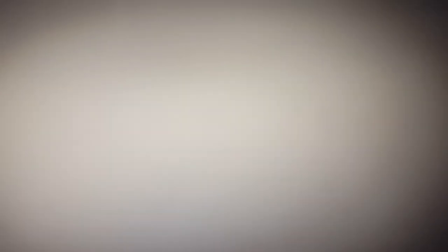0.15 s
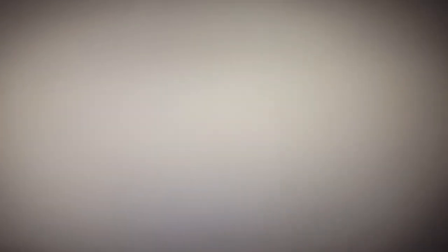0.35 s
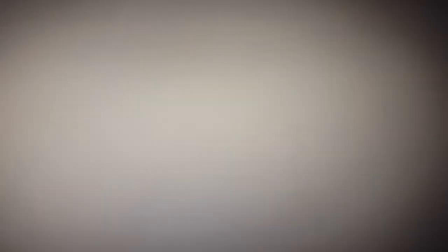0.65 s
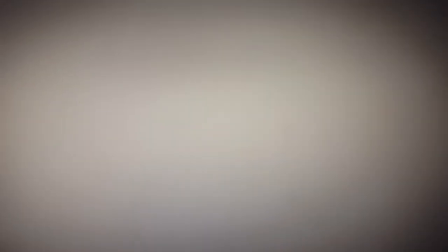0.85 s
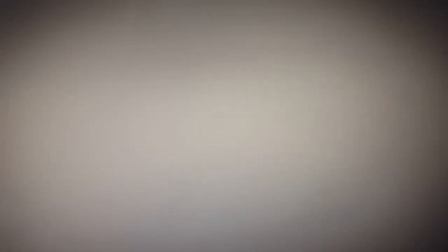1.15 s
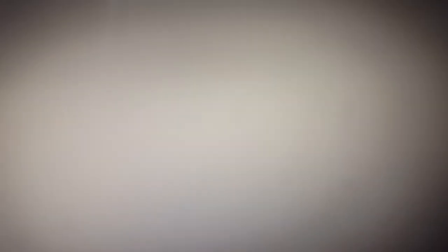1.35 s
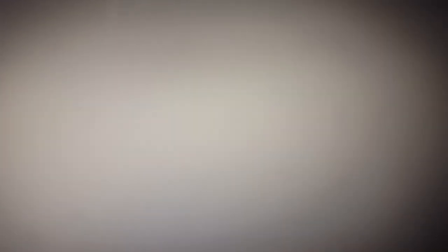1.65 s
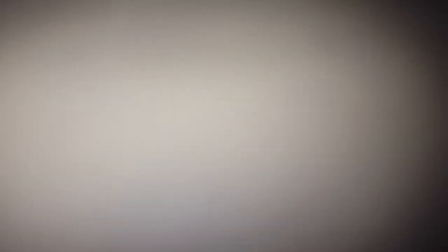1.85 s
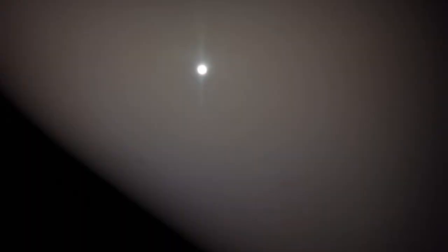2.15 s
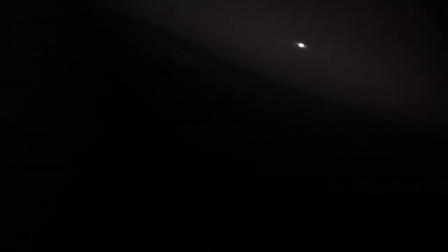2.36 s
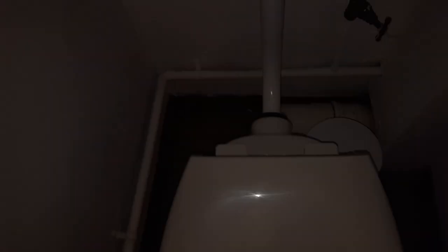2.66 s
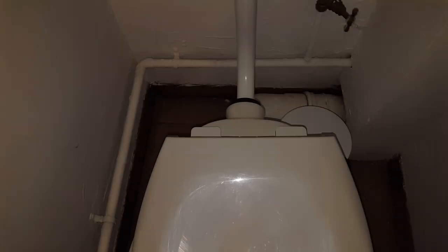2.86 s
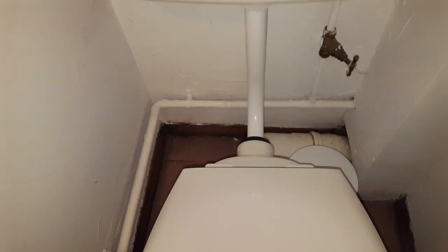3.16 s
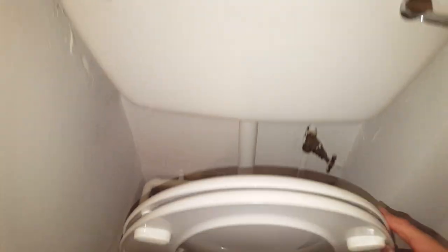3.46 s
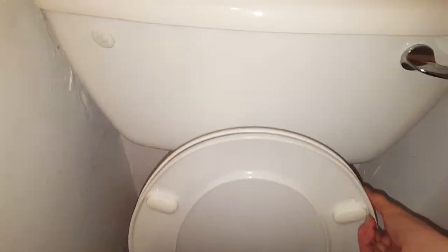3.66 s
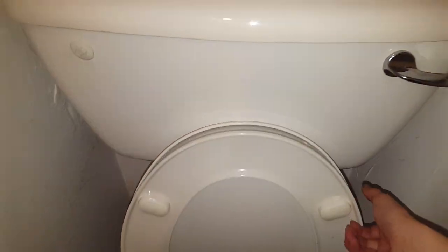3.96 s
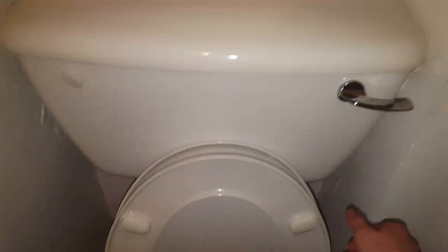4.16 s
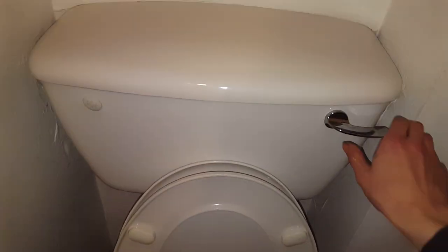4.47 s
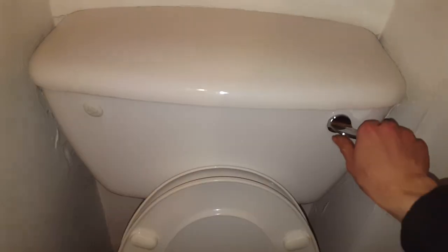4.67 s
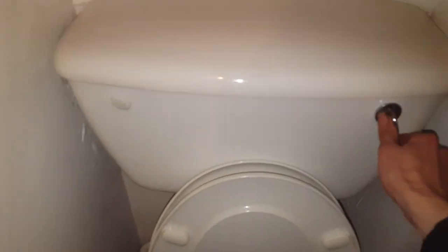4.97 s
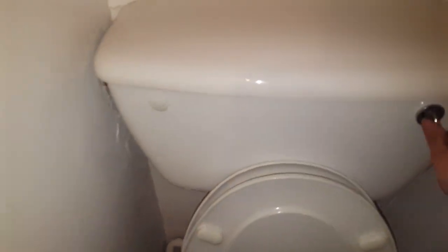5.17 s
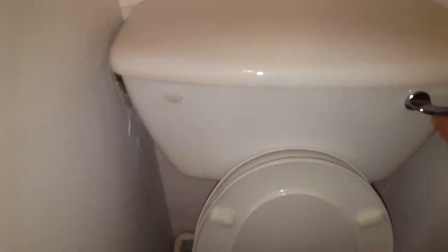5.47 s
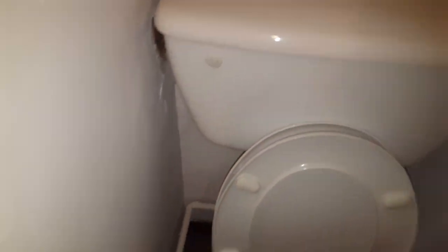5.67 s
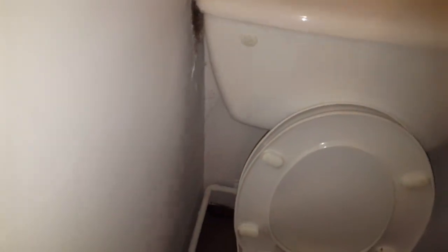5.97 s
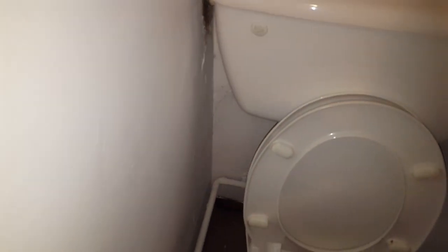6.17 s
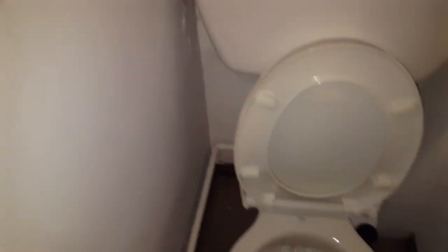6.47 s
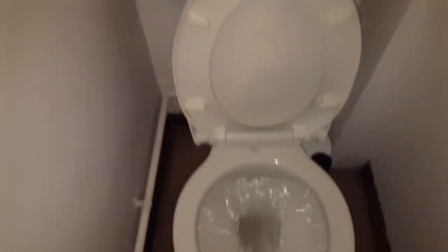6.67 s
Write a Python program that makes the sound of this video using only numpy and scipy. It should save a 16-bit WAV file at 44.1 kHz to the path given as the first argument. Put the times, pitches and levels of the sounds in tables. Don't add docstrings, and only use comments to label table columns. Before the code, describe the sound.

A light door knocks, scrapes and thumps closed with boxy resonance, muting a low fan. Soft cloth and finger ticks follow while a toilet seat is raised, striking the cistern hard. The flush handle clunks, the siphon gulps, and metal clanks against ceramic. After a brief trickle, water bursts into the bowl, still rushing at the end. Phone microphone, close, tiled cubicle.

```python
import sys
import numpy as np
from scipy import signal
from scipy.fft import rfft, irfft, next_fast_len
from scipy.io import wavfile
from scipy.ndimage import uniform_filter1d

SR = 44100
rng = np.random.default_rng(int(sys.argv[2]) if len(sys.argv) > 2 else 0)


def ratio_of_db(decibels):
    return 10 ** (np.asarray(decibels, float) / 20)


def generate_wav(signal):
    frames = np.transpose(np.atleast_2d(signal))
    scaled = np.clip(frames, -1, 1) * 32767
    pcm = np.round(scaled).astype(np.int16)
    wavfile.write(sys.argv[1], SR, pcm)


N = 300762

# start_s, peak_db, thud_rel_db, crack_rel_db
LATCH = [
    (0.716, -20, 13.5, -61),
    (0.732, 4.5, -11, -74.5),
]
BOLT = [
    (0.975, -8, 2.5, -30),
    (1.142, -21, -2, -15),
]
DOOR = [
    (1.646, -2, 1, -48),
    (1.752, -13.5, 6.1, -63.5),
]
SHUT = [
    (2.0052, -5.5, -0.63, -65.5),
]
SEAT = [
    (2.737, -35.5, 1, -7),
    (2.96, -18.5, -0.5, -16),
    (3.078, -34.5, 1, -22),
    (3.229, -32, 2.5, -25),
    (3.897, -5, -29.5, -13),
    (3.92, -22.5, 7, -2),
    (4.085, -34, 3.5, -59),
    (4.211, -46, 14, -16),
]
# pitch_hz, level_db, t60_s
CUBICLE = [(109, -24.5, 0.48), (142.6, 8.5, 0.8), (182.1, -4.5, 0.63), (235, -9, 0.32), (270.6, -3, 0.9),
           (355, -2.5, 0.23), (409.7, -6, 0.69), (438.3, -9.5, 0.55)]
# freq_hz, likeness (0-1)
ALIKE = [(30, 0.29), (80, 0.97), (150, 0.99), (300, 0.92), (600, 0.72), (1500, 0.02), (8000, 0.019)]
# time_s, effort_db
SUCK = [
    (4.86, -15),
    (4.9, -9.5),
    (4.945, -11),
    (4.96, 8),
    (5.01, 5),
    (5.07, 9),
    (5.1, -13.5),
]
# full_effort_db, growth_db_per_db
SUCK_LAWS = [
    (-37, 1.2),
    (-41, 0.26),
    (-37.5, 0.8),
    (-46.5, 1.34),
]
# time_s, effort_db
FLOW = [
    (5.26, -28),
    (5.6, -28),
    (5.68, -34),
    (5.75, -28.5),
    (6.09, -25),
    (6.13, -20),
    (6.24, -14.5),
    (6.5, -5.5),
    (6.82, -5.5),
]
# full_effort_db, growth_db_per_db
FLOW_LAWS = [
    (-18.5, 0.84),
    (-14.5, 1.255),
    (-27.5, 1.103),
    (-32.5, 2.3),
]


def unit(x):
    return x / np.sqrt(np.mean(x ** 2) + 1e-20)


def along(points, hz):
    f, v = np.transpose(points)
    return np.interp(np.log(hz + 1), np.log(f + 1), v)


def pair(size):
    hz, t, z = signal.stft(rng.standard_normal((2, size)), SR, nperseg=256)
    return hz[:, None], t, z


def blend(a, b, hz):
    turn = np.arccos(np.clip(along(ALIKE, hz), 0, 1)) / 2
    mid, side = np.cos(turn) * a, np.sin(turn) * b
    return np.array([mid + side, mid - side])


def filtered(x, gain):
    m = next_fast_len(N + 4096)
    return irfft(rfft(x, m) * gain(np.fft.rfftfreq(m, 1 / SR)), m)[:, :N]


def no_deep_bass(hz):
    return 1 / (1 + 95 / (1j * hz + 0.00077)) ** 3


def shape(spectrum):
    return lambda hz: ratio_of_db(along(spectrum, hz))


def peaks(modes, between_db):
    low_hz, high_hz = modes[0][0], modes[-1][0]

    def half_width_hz(t60):
        return np.log(1000) / (2 * np.pi * np.clip(t60, .05, .5))

    def gain(f):
        low_cut = 1 + (0.099 * low_hz / (f + 1)) ** 4
        high_cut = 1 + (f / (0.066 * high_hz)) ** 2
        total = ratio_of_db(between_db) / low_cut / high_cut
        for hz, db, t60 in modes:
            half = half_width_hz(t60)
            total = total + ratio_of_db(db) * half / np.abs(f - hz + 1j * half)
        return total
    return gain


def rush(gain, patchy_db):
    m = next_fast_len(N)
    _, _, z = pair(m)
    field = uniform_filter1d(rng.standard_normal(z.shape[1:]), 3, 0)
    field = unit(uniform_filter1d(field, 12, 1))
    a, b = rfft(signal.istft(z * ratio_of_db(patchy_db * field), nperseg=256)[1], m)
    hz = np.fft.rfftfreq(m, 1 / SR)
    return unit(irfft(gain(hz) * blend(a, b, hz), m)[:, :N])


def driven(effort, laws):
    s, db = np.transpose(effort)
    t = np.arange(N) / SR
    active = (t >= s[0]) * (t <= s[-1])
    effort_db = np.interp(t, s, db)
    return np.array([ratio_of_db(top_db + growth * effort_db) * active for top_db, growth in laws])


def add(out, s, x, db, pan_db):
    part = out[:, round(s * SR):][:, :x.shape[1]]
    part += (x * ratio_of_db(db + pan_db * np.array([[.5], [-.5]])))[:, :part.shape[1]]


def ring(modes, t, stretch, tilt_db):
    hz, db, t60 = np.transpose(modes)[:, :, None, None]
    strength, lag, beat = rng.standard_normal((3, len(modes), 1, 1))
    unlike = np.arccos(np.clip(along(ALIKE, hz), 0, 1))
    phase = 1.03 * unlike * lag * np.array([[.5], [-.5]])
    decay_db = 60 * t / (np.minimum(t60, .5) * stretch)
    fade = ratio_of_db(db + strength + tilt_db * np.log2(hz / 800) - decay_db)
    sign = np.where(np.diff(hz, axis=0, prepend=0) < hz / 50, -1, 1)
    flutter = 1 + .3 * np.sin(90 * beat * t)
    x = (sign * flutter * fade * np.sin(2 * np.pi * hz * t + phase)).sum(axis=0)
    return x / np.abs(x).max()


def tail(colour, stretch, size):
    # freq_hz, t60_s
    tile_decay = [(100, 0.71), (500, 0.29), (2000, 0.24), (5000, 0.22), (14000, 0.17)]
    hz, t, (a, b) = pair(size + 256)
    decay_db = 60 * np.maximum(t - 128 / SR, 0) / (along(tile_decay, hz) * stretch)
    z = blend(a, b, hz) * ratio_of_db(along(colour, hz) - decay_db)
    return signal.istft(z, nperseg=256)[1][:, 128:size + 128]


def blows(events, modes, ring_db, scatter_db, soft_s, boom_tilt_db, stretch, pan_db, hump_db=14):
    out, t = np.zeros((2, N)), np.arange(int(.45 * SR)) / SR
    rise = 1 - np.exp(-(t / soft_s) ** 2)
    direct = 1 + .55 * np.exp(-t / .005)
    for s, db, thud_db, crack_db in events:
        colour = [(1, thud_db), (250, thud_db + hump_db), (1200, 0.016),
                  (3000, crack_db / 2), (7000, crack_db - 5), (16000, crack_db - 26)]
        snap = ratio_of_db(crack_db - 60 * t / 0.0062) * rng.standard_normal(len(t))
        body = ratio_of_db(ring_db) * ring(modes, t, stretch, 0.056 * (crack_db + 16.5))
        body += ratio_of_db(scatter_db) * tail(colour, stretch, len(t))
        add(out, s, rise * direct * body + 0.05 * snap, db, pan_db)
        add(out, s, rise * ring(CUBICLE, t, 0.8, boom_tilt_db), db + thud_db, 0)
    return out


def ticks(events, skirt_db, stretch, pan_db, wide, tone):
    out, t = np.zeros((2, N)), np.arange(int(.2 * SR)) / SR
    direct = 1 + 1.5 * np.exp(-t / .004)
    for s, db, hz in events:
        colour = [(hz / 5, 0.98 * skirt_db), (hz / wide, skirt_db), (hz, 0),
                  (hz * wide, skirt_db), (hz * 4, 2 * skirt_db), (hz * 8, 4.2 * skirt_db)]
        click = ratio_of_db(-60 * t / .012) * (1 - np.exp(-t * hz / 2)) * np.sin(2 * np.pi * hz * t)
        add(out, s, tone * click + ratio_of_db(9) * direct * tail(colour, stretch, len(t)), db, pan_db)
    return out


def notes(rows, pan_db):
    out, t = np.zeros((2, N)), np.arange(int(.4 * SR))[None] / SR
    for s, db, hz, life_s, glide in rows:
        u = t / life_s
        waver = 1 + .25 * np.sin(2 * np.pi * hz / 45 * t)
        swell = 3 * u * np.exp(1 - 3 * u - u ** 3)
        add(out, s, waver * swell * np.sin(2 * np.pi * hz * t * (1 + glide * u / 2)), db, pan_db)
    return out


def rubbing(drive, modes, hollow, ring_db, boom_db, rasp_db, boom_tilt_db, patchy_db, between_db):
    # freq_hz, level_db
    rasp_spectrum = [(1470, -3.5), (2500, 2), (3230, -3.5), (3490, -6), (3600, -35), (4020, -34),
                     (16000, -45)]
    ringing, boom, rasp = drive
    tilted = [(hz, db + boom_tilt_db * np.log2(hz / 250), t60) for hz, db, t60 in hollow]
    x = ratio_of_db(ring_db) * ringing * rush(peaks(modes, between_db), patchy_db)
    x += ratio_of_db(boom_db) * boom * rush(peaks(tilted, -13), patchy_db=-2)
    return x + ratio_of_db(rasp_db) * rasp * rush(shape(rasp_spectrum), patchy_db=2.5)


def air():
    # time_s,
    # effort_db
    stir = [(0, 0), (1.6, -3), (1.8, -10.5), (2.0, -1), (2.3, -2), (2.7, -4.5), (2.95, -0.5), (3.2, -1.5),
            (3.45, -0.5), (4.05, -1.5), (4.4, -5.5), (4.75, -3), (5.4, -25), (6.82, 2.5)]
    # full_effort_db, growth_db_per_db
    stir_laws = [
        (-51, 1.8),
        (-55, 1.9),
        (-59, 2),
    ]
    # pitch_hz, rms_db
    fan = [(199.2, -50.5), (247.6, -54.5), (387.6, -70), (759.0, -64)]
    # freq_hz, level_db_per_hz
    rumble_spectrum = [(53, -48.5), (90, -0.5), (230, -0.5), (473, -7.5), (528, -19.5), (600, -21.5),
                       (780, -22.5), (1320, -120)]
    murmur_spectrum = [(290, -29.5), (500, -5), (1030, -10), (2200, -10), (2450, -10), (3500, -26),
                       (4550, -38), (7700, -120)]
    hiss_spectrum = [(1760, -39), (3000, -7), (4170, -10), (5140, -9.5), (13400, -18.5), (16000, -22.5)]
    shake_spectrum = [(8.8, -26.5), (15, -2), (27, 0), (92, -3.5), (110, -3.5), (140, -32), (240, -120)]
    fan_shut_s, fan_rumble_db, shake_db = 1.645, -71, -67.5
    wake_db, wake_t60_s = -17.5, 0.42

    t = np.arange(N) / SR
    fan_on = t < fan_shut_s
    rumble, murmur, hiss = driven(stir, stir_laws)
    rumble = rumble + ratio_of_db(fan_rumble_db) * fan_on
    for s, db, thud_db, _ in LATCH + BOLT + DOOR + SHUT + SEAT:
        onset = np.clip((t - s) / 0.024, 0, 1)
        rumble += onset * ratio_of_db(db + thud_db + wake_db - 60 * np.abs(t - s) / wake_t60_s)
    hiss = hiss + driven(SUCK, SUCK_LAWS)[-1] + driven(FLOW, FLOW_LAWS)[-1]
    lines = np.zeros(N)
    for hz, db in fan:
        drift = np.cumsum(rng.normal(0, 0.025, N))
        lines += ratio_of_db(db + 1) * np.sin(2 * np.pi * hz * t + drift)
    x = rumble * rush(shape(rumble_spectrum), patchy_db=0)
    x += murmur * rush(shape(murmur_spectrum), patchy_db=2)
    x += ratio_of_db(shake_db) * rush(shape(shake_spectrum), patchy_db=0)
    return x + hiss * rush(shape(hiss_spectrum), patchy_db=1.2) + lines * fan_on


def deep_sway():
    # start_s, level_db, pitch_hz, t60_s
    sway = [
        (0.731, -35, 58.7, 0.78),
        (.98, -33, 60, 0.42),
        (1.652, -39, 60.7, 0.15),
        (3.899, -32.5, 51.3, 0.11),
    ]
    out, t = np.zeros((2, N)), np.arange(SR)[None] / SR
    for s, db, hz, t60 in sway:
        add(out, s, ratio_of_db(-60 * t / t60) * (1 - np.exp(-t / .01)) * np.sin(2 * np.pi * hz * t), db, 0)
    return out


def small_ticks():
    # start_s, peak_db, pitch_hz
    tick_events = [(2.2638, -51.5, 2370), (2.5664, -56, 3680), (3.0205, -44.5, 6040), (3.1113, -51.5, 2300),
                   (3.1512, -51, 2410), (3.3428, -37.5, 5600), (3.3851, -40, 2050), (3.5428, -44.5, 5900),
                   (3.6636, -50, 6500), (4.612, -54, 1175), (4.8963, -51, 9000), (3.345, -48, 12800),
                   (3.617, -60, 8000), (1.985, -54.5, 3360)]
    return ticks(tick_events, skirt_db=-7.5, stretch=1.29, pan_db=3, wide=1.18, tone=0.15)


def first_contacts():
    # start_s, peak_db, pitch_hz
    snaps = [
        (.7315, -26.5, 2560),
        (1.6462, -35, 4370),
        (3.8965, -7.5, 2420),
    ]
    return ticks(snaps, skirt_db=-13.5, stretch=0.091, pan_db=2, wide=1.08, tone=0.54)


def door():
    # pitch_hz, level_db, t60_s
    panel = [(517, -14, .2), (612, -18, .1), (714, -18, .3), (759, 0, .25), (802, -8, .3), (867, -20, .24),
             (1109, -26, .14), (1270, -27, .2), (1676, -8, .17), (1698, -8, .2), (2300, -34, .15),
             (2720, -36, .15)]
    strike = [(597, -0.5, 0.13), (640, -9, 0.64), (736, 7, 0.32), (1280, -7.5, 0.38), (1700, -10.5, 0.38),
              (2290, -16.5, 0.35), (2780, -30, 0.49), (3410, -31, 0.26)]
    slab = [(533, -1.5, .2), (670, -4, .25), (860, 0, .13), (1290, -7, .16), (1400, -8, .14),
            (1700, -4, .12), (2010, -18, .1), (2260, -20, .15), (2720, -15, .2), (3900, -34, .1)]
    jamb = [(519, -6, .14), (677, -10, .2), (830, -3, .16), (1276, -2.5, .25), (1416, -4, .16),
            (1690, 2.5, .2), (1780, 1.5, .12), (3025, -19, .14), (3300, -24, .1), (3720, -25, .08)]
    scrape = [(755, 12, .2), (880, 4, .15), (1280, 5, .2), (1385, 6, .2), (1690, 12, .25), (2090, -5, .25),
              (2270, 3, .18), (2710, 3, .2), (3030, -3, .25), (3395, -11, .2), (3715, -12, .25),
              (3905, -10, .25), (4305, -12, .2),
              (4510, -16, .3), (4900, -17, .2), (5620, -18, .2), (5900, -19, .2), (6725, -15, .3),
              (9405, -16, .3)]
    leaf = [(180, -9, 0.12), (235, -4, 0.18), (290, 0.5, 0.12), (345, -11.5, 0.1), (430, -15.5, 0.16)]
    # start_s, peak_db, thud_rel_db, crack_rel_db
    catch = [
        (1.212, -27, 4, -19),
        (1.23, -17, 8, -45),
    ]
    # time_s, effort_db
    drag = [
        (1.138, -16),
        (1.154, -11),
        (1.21, -14),
        (1.28, -11.5),
        (1.35, -9.5),
        (1.39, -3.5),
        (1.455, 0.5),
        (1.57, -24),
        (1.64, -15),
    ]
    # full_effort_db, growth_db_per_db
    drag_laws = [
        (-24.5, 1.12),
        (-19.5, 0.9),
        (-48.5, 2.1),
    ]
    # start_s, peak_db, pitch_hz, life_s, glide_ratio
    creaks = [(.715, -17, 760, .022, 0), (1.227, -11, 775, .03, 0), (1.145, -29, 320, .05, 0),
              (1.245, -20, 385, .07, -.03), (1.385, -26, 765, .04, 0), (1.425, -14, 225, .05, -.03),
              (1.437, -24, 755, .035, -.04), (1.455, -29, 716, .1, 0), (1.465, -17, 205, .05, 0),
              (1.422, -25, 1690, .04, 0), (.737, -25, 1690, .07, 0), (.983, -24, 1280, .045, 0),
              (.976, -25, 1690, .045, 0), (.976, -16, 750, .04, 0), (.776, -16, 760, .055, 0),
              (1.14, -38, 2290, .07, 0)]
    booms = [
        (1.646, -13, 178.3, 0.14, 0.042),
        (1.646, -10, 368.5, 0.061, -0.04),
        (1.77, -9.5, 174.7, 0.047, 0.026),
        (2.005, -12.5, 177, 0.036, -0.024),
        (2.07, -26.5, 239, 0.091, -0.019),
        (.79, -20.5, 180, 0.052, -0.00036),
    ]
    lag_samples = 11

    x = blows(LATCH, panel, ring_db=-3.5, scatter_db=-14, soft_s=0.0021, boom_tilt_db=14,
              stretch=1.08, pan_db=2.7)
    x += blows(BOLT, strike, ring_db=-0.26, scatter_db=-12.5, soft_s=0.0024, boom_tilt_db=7.9,
               stretch=0.87, pan_db=5.6)
    x += blows(DOOR, slab, ring_db=-2, scatter_db=-2.76, soft_s=0.00035, boom_tilt_db=0.14,
               stretch=1, pan_db=0.36)
    x += blows(SHUT, jamb, ring_db=-1.2, scatter_db=-0.92, soft_s=0.0019, boom_tilt_db=-5.5,
               stretch=1, pan_db=0.65)
    x += rubbing(driven(drag, drag_laws), scrape, leaf, ring_db=-1.3, boom_db=-1, rasp_db=-20.5,
                 boom_tilt_db=0.3, patchy_db=1.8, between_db=-16.5)
    x += blows(catch, panel, ring_db=-2, scatter_db=-0.5, soft_s=0.0015, boom_tilt_db=3.5,
               stretch=0.53, pan_db=2.1)
    x += notes(creaks, 1.5) + notes(booms, 0.3)
    return np.array([x[0], np.roll(x[1], lag_samples)])


def seat():
    # pitch_hz, level_db, t60_s
    plastic = [(1257, 1.5, 0.19), (1532, 16.5, 0.031), (1760, 6, 0.099), (2100, 2, 0.2), (2490, 1, 0.14),
               (2450, -30, 0.31), (2780, -11, 0.15), (3680, -39, 0.16), (5410, -9.5, 0.18)]
    # start_s, peak_db, pitch_hz, life_s, glide_ratio
    bumps = [(2.77, -40, 203, 0.093, 0.0084), (2.77, -46, 345, 0.061, 0.0011), (2.935, -37, 245, 0.034, 0),
             (2.957, -33, 348, 0.11, 0), (2.96, -29.5, 215, 0.093, 0.0042), (3.0, -26, 143, 0.15, 0.0048),
             (3.378, -34.5, 141, 0.086, 0), (3.915, -30, 290, 0.093, 0.0033),
             (4.085, -30.5, 149.4, 0.11, 0), (4.21, -45, 148, .08, 0), (4.412, -58, 4200, .014, 0)]
    x = blows(SEAT, plastic, ring_db=-1.2, scatter_db=0.18, soft_s=0.0014, boom_tilt_db=-5,
              stretch=1, pan_db=1, hump_db=1.5)
    return x + notes(bumps, 0.3)


def cistern():
    # pitch_hz, level_db, t60_s
    linkage = [(300, -17, 0.038), (558, 0.5, 0.3), (770, -19, 0.38), (1030, -21, 0.18), (1250, -0.5, 0.82),
               (1770, -22, 0.085), (2070, 1, 0.17), (3100, -11, 0.11)]
    siphon = [(297, -18, 0.38), (342, -6, 0.097), (410, -6, 0.17), (585, -14, 0.058), (688, -12, 0.14),
              (1130, -14, 0.052)]
    tank = [(781, 3, .3), (921, -6, .35), (1225, -4, .15), (1335, 3, .09), (1373, -1, .2), (2078, -10, .2),
            (2342, -6, .2), (2498, -5, .24), (2681, -7, .25), (2830, -12, .3), (3390, -16, .3),
            (3924, -19, .3), (4377, -22, .22)]
    ceramic = [(781, -6, .4), (850, -8, .3), (1087, -12, .3), (1180, -2, .4), (1244, -1, .17),
               (1424, 3, .2), (1949, -14, .3), (2320, -2, .3), (2659, -6, .24), (3004, -7, .45),
               (3400, -8, .3), (3924, -12, .2), (4382, -20, .4), (4780, -22.5, .17)]
    # start_s, peak_db, thud_rel_db, crack_rel_db
    lever = [
        (4.744, -13.5, -14.5, -47),
        (4.865, -24.5, -6, -37),
    ]
    plunge = [
        (4.952, -0.5, -7, -54),
        (5.028, -5.5, -1.5, -25),
        (6.169, -27.5, 1, 6),
    ]
    clank = [
        (5.082, -5.5, -1, -7.5),
        (5.112, 0.5, -16.5, -50),
    ]
    rebound = [
        (5.198, -6.5, -0.5, -16.5),
        (5.212, -8, 1.5, -11),
        (5.228, -4, -27, -15.5),
    ]
    # start_s, peak_db, pitch_hz, life_s, glide_ratio
    gulps = [
        (4.954, -5.5, 372, 0.041, -0.067),
        (4.975, -20, 277.5, 0.079, -0.018),
        (4.985, -16, 585, 0.029, 0.052),
        (5.022, -11, 430, 0.026, -0.022),
        (5.04, -13.5, 272.3, 0.062, -0.05),
        (5.05, -16, 355, 0.054, -0.066),
    ]
    chimes = [(5.0815, -7, 1424, .022, 0), (5.0815, -11, 1240, .02, 0), (5.104, -14, 781, .06, 0),
              (5.2, -17, 1335, .03, 0), (5.228, -22, 781, .07, 0), (5.1, -17.5, 1707, .12, 0),
              (5.224, -16, 1707, .08, 0), (5.322, -38, 1707, .07, 0), (5.092, -21, 2325, .08, 0),
              (5.1, -27.5, 3004, .09, 0), (5.08, -30, 3400, .07, 0), (5.19, -28, 2720, .1, 0),
              (5.225, -37, 3924, .07, 0)]
    # time_s, effort_db
    slosh = [
        (5.08, -6),
        (5.09, 0),
        (5.184, -6),
        (5.226, -2.5),
        (5.26, -4.5),
        (5.356, -26.5),
        (5.5, -77),
    ]
    # full_effort_db, growth_db_per_db
    slosh_laws = [
        (-9, 1.04),
        (-19.5, 0.4),
        (-21, 1.5),
    ]

    x = blows(lever, linkage, ring_db=-14, scatter_db=-0.65, soft_s=0.0019, boom_tilt_db=1.3,
              stretch=1.25, pan_db=0.3)
    x += blows(plunge, siphon, ring_db=-6.5, scatter_db=-14, soft_s=0.0048, boom_tilt_db=9.1,
               stretch=4.2, pan_db=0.71)
    x += notes(gulps, 1)
    x += blows(rebound, tank, ring_db=-1.9, scatter_db=-9.5, soft_s=0.0014, boom_tilt_db=-1.5,
               stretch=0.62, pan_db=2.7)
    x += blows(clank, ceramic, ring_db=-1.9, scatter_db=-6, soft_s=0.00018, boom_tilt_db=-2.8,
               stretch=0.44, pan_db=7.6)
    x += notes(chimes, 7.6)
    gulp = driven(SUCK, SUCK_LAWS)[:-1] + driven(slosh, slosh_laws)
    return x + rubbing(gulp, ceramic + tank, CUBICLE, ring_db=-4.5, boom_db=-1.8, rasp_db=-0.8,
                       boom_tilt_db=8.4, patchy_db=2.8, between_db=-10)


def splashes():
    # start_s, peak_db, pitch_hz
    drops = [(5.5443, -33.5, 2630), (5.7912, -31, 2830), (6.1295, -18.5, 2700), (5.5423, -49.5, 11300),
             (5.8551, -51, 8600), (6.0147, -41.5, 6140), (6.2465, -16, 2826), (5.3927, -39, 3040),
             (5.9574, -37, 3610), (6.3281, -14.5, 2560), (6.4808, -14, 2710), (6.7287, -13, 2530),
             (6.2477, -25, 5250), (6.2485, -25.5, 9050), (6.3574, -19, 6780), (6.4258, -24, 9600),
             (6.4894, -24, 5020), (6.5694, -29.5, 8900), (6.7007, -24.5, 6160)]
    return ticks(drops, skirt_db=-19.5, stretch=0.73, pan_db=3.9, wide=1.102, tone=0.63)


def bubbles(count, mid_hz, spread, cycles, rise):
    when, tone, size, side = rng.random((count, 4)).T[:, :, None]
    hz = mid_hz * np.exp(spread * np.sqrt(12) * (tone - .5))
    k, start = np.arange(1024), int(FLOW[0][0] * SR)
    life = k / SR * hz / cycles
    envelope = ratio_of_db(-4 * np.log(size + 0.081)) * life * np.exp(-4 * life)
    x = envelope * np.sin(2 * np.pi * cycles * life * (1 + rise * life))
    at = ((start + when * (N - start)).astype(int) + k).ravel()
    both = np.array([np.bincount(at, (x * w).ravel(), N + 1536)[:N] for w in (side, 1 - side)])
    return both / both[:, start:].std()


def water():
    # pitch_hz, level_db, t60_s
    bowl_modes = [(128, -12.5, 0.79), (204.4, -8.5, 0.37), (278.6, -1.5, 0.49), (311.6, -6, 0.068),
                  (355, 3, 0.58), (416.5, -21, 0.6), (426.4, -4.5, 0.35), (596, -17, 0.18),
                  (800, -15, 0.038)]
    # freq_hz, level_db_per_hz
    froth_spectrum = [(400, -56), (736, -0.5), (930, -11), (1230, -1), (1580, -1.5), (2570, -3),
                      (4500, -26.5), (9900, -120)]
    spray_spectrum = [(2060, -33), (3500, -1.5), (4050, -2), (9260, -7.5), (10600, -15.5), (15000, -18),
                      (16000, -30)]
    # start_s, peak_db, pitch_hz, life_s, glide_ratio
    glugs = [(6.255, -33, 1404, 0.018, 0.045), (6.3, -24.5, 2330, 0.021, 0.018),
             (6.375, -27, 1146, 0.046, 0.068), (6.478, -24, 2398, .02, .05),
             (6.515, -18, 1162, 0.037, 0.067), (6.525, -20.5, 2130, 0.021, 0.022),
             (6.578, -31, 2480, 0.016, .02), (6.61, -20, 1455, 0.029, .03), (6.69, -22, 1043, 0.08, 0.015),
             (6.745, -19, 1755, 0.014, 0.06)]
    trickle = [(5.461, -38.5, 430, 0.1, 0.011), (5.54, -41.5, 800, 0.022, 0.051),
               (5.657, -43, 1700, 0.017, 0.0045), (6.168, -18.5, 290, 0.021, 0),
               (6.168, -43, 720, .03, 0.01), (5.735, -39, 653, 0.024, 0.033),
               (5.799, -41, 1346, 0.022, 0.0014), (5.885, -42.5, 855, 0.03, .03),
               (5.985, -49, 800, 0.026, .03)]
    # freq_hz, left_minus_right_db
    facing = [(60, -2), (240, -0.5), (950, 2.5), (3770, 1), (8500, 8), (15000, 13.5)]
    bowl_full_db, flood_s = -24.5, 6.171

    bowl, froth, spray, _ = driven(FLOW, FLOW_LAWS)
    bowl = np.where(np.arange(N) < flood_s * SR, bowl, ratio_of_db(bowl_full_db))
    x = bowl * rush(peaks(bowl_modes, -13.5), patchy_db=-1)
    large = bubbles(count=2600, mid_hz=1800, spread=0.369, cycles=14, rise=0.036)
    x += froth * (1.01 * rush(shape(froth_spectrum), patchy_db=2.5) + 0.71 * large)
    x += notes(glugs + trickle, 0.3)
    fine = bubbles(count=500, mid_hz=7280, spread=0.39, cycles=19, rise=0.045)
    x += spray * (1.35 * rush(shape(spray_spectrum), patchy_db=3.5) + 0.5 * fine)

    def toward_left(hz):
        return ratio_of_db(along(facing, hz) * np.array([[.5], [-.5]]))
    return filtered(x, lambda hz: no_deep_bass(hz) * toward_left(hz))


def scene():
    knocks = small_ticks() + door() + seat() + cistern()
    background = air() + deep_sway()
    return background + filtered(knocks, no_deep_bass) + first_contacts() + splashes() + water()


def roll_off(x):
    return signal.sosfilt(signal.butter(12, 16670, fs=SR, output="sos"), x)


def record(dry):
    clipped = dry / (1 + np.abs(dry) ** 20) ** (1 / 20)
    heard = filtered(clipped, lambda hz: 1 / (1 + (hz / 16000) ** 60))
    return roll_off(heard)


dry = scene()
out = record(dry)
generate_wav(out)
```